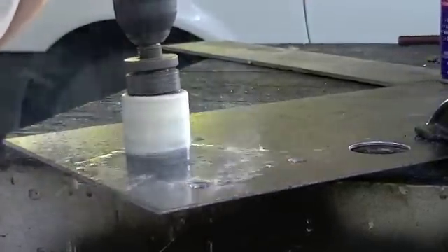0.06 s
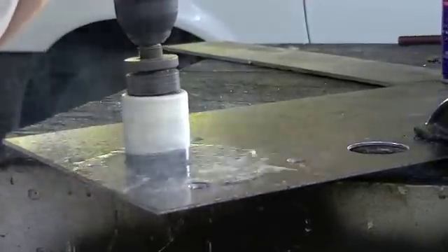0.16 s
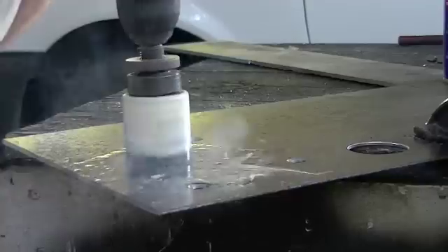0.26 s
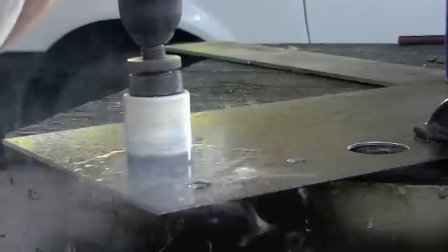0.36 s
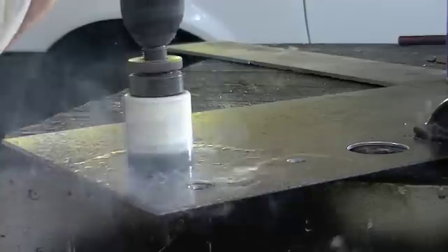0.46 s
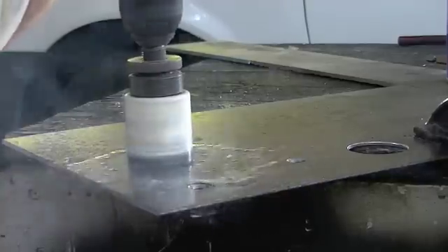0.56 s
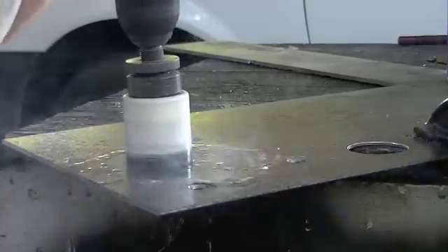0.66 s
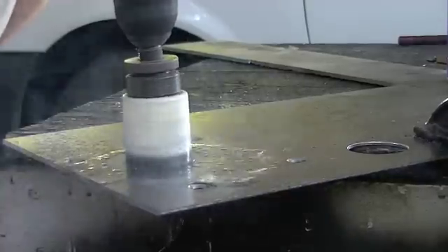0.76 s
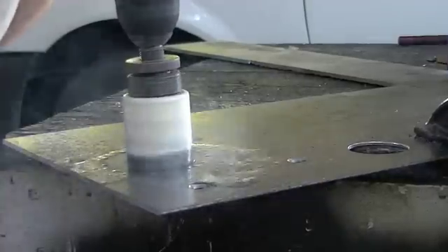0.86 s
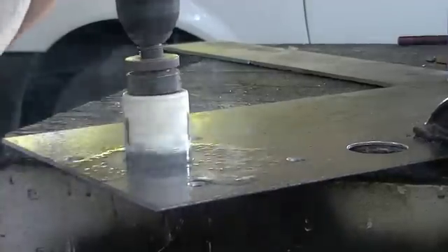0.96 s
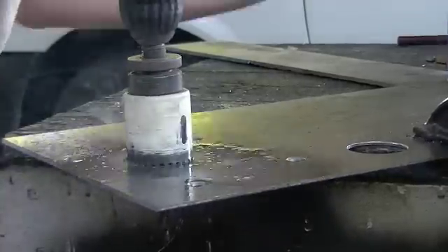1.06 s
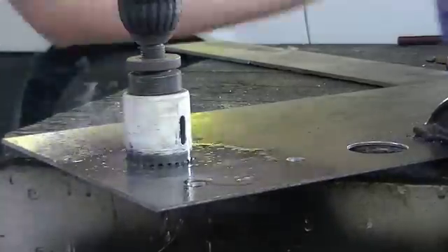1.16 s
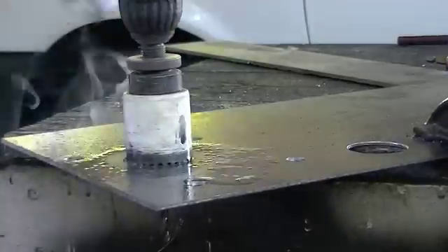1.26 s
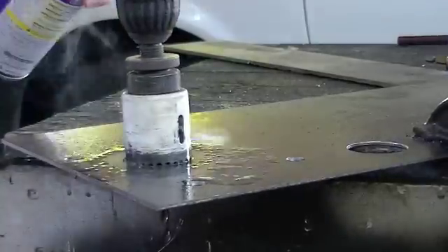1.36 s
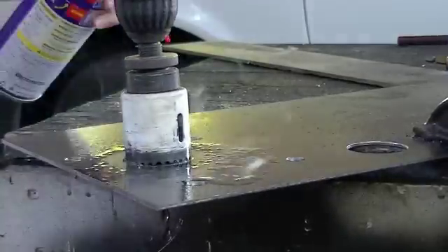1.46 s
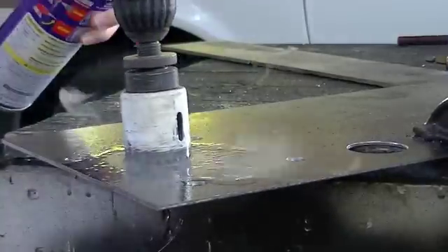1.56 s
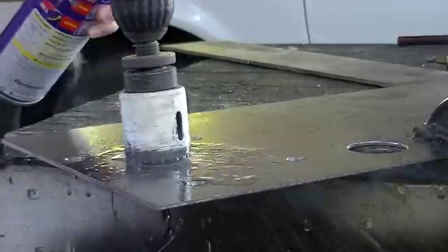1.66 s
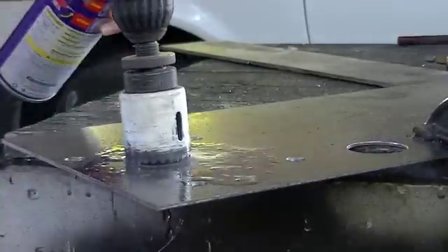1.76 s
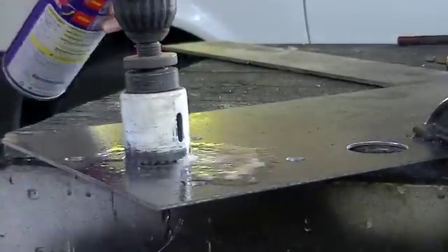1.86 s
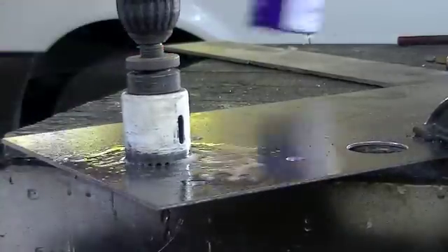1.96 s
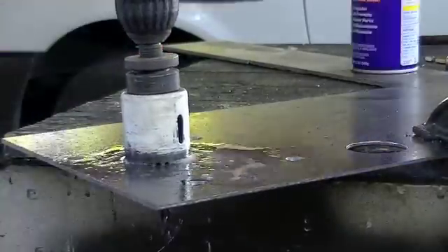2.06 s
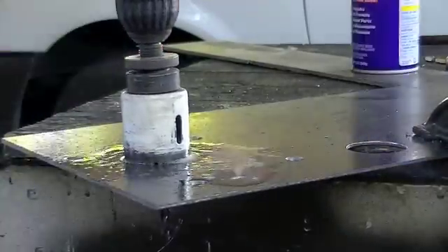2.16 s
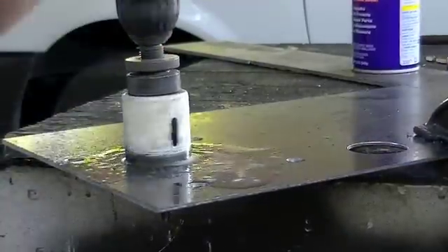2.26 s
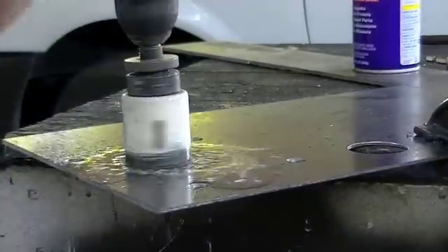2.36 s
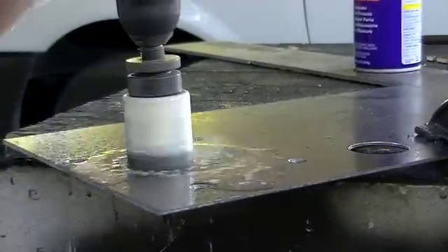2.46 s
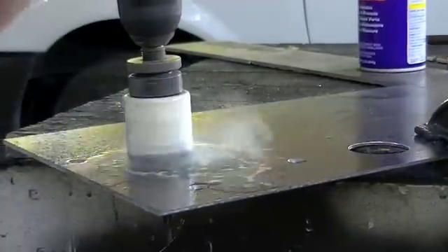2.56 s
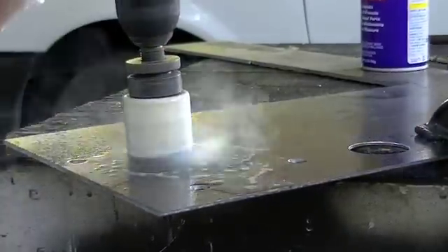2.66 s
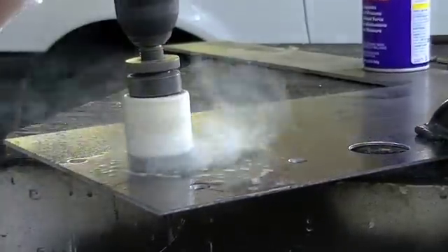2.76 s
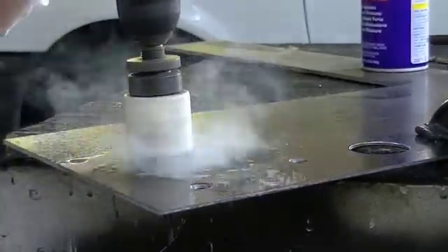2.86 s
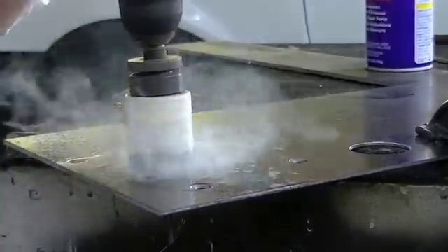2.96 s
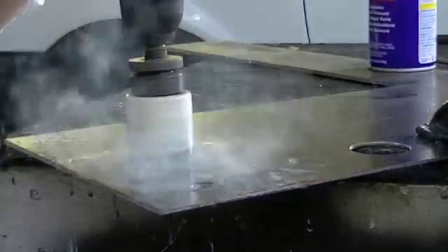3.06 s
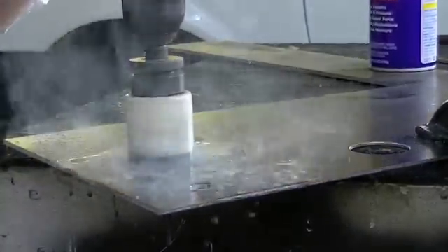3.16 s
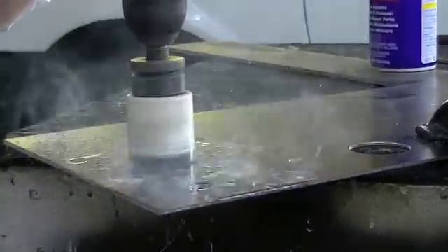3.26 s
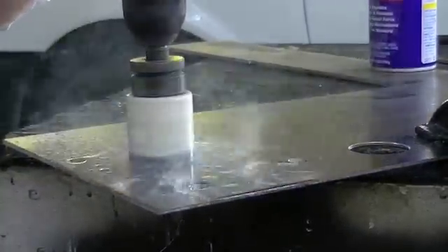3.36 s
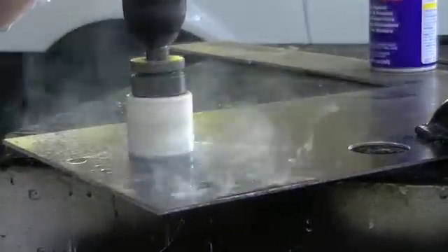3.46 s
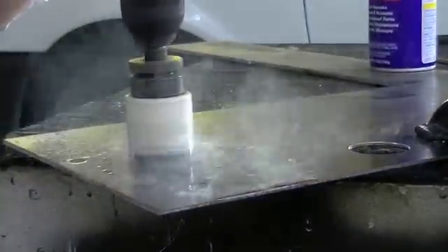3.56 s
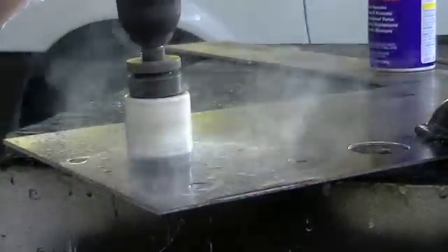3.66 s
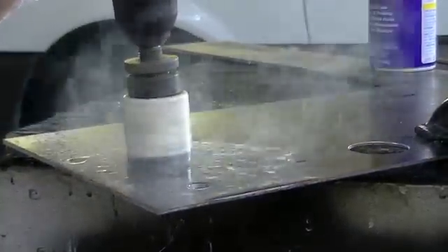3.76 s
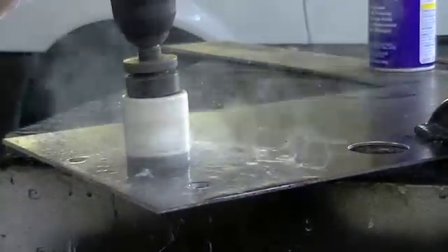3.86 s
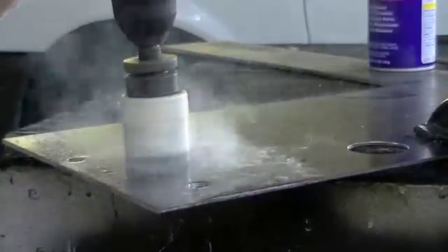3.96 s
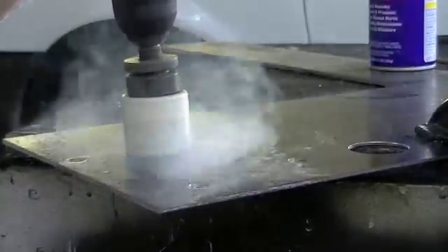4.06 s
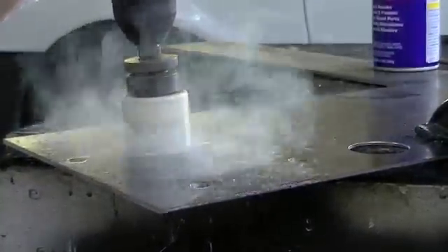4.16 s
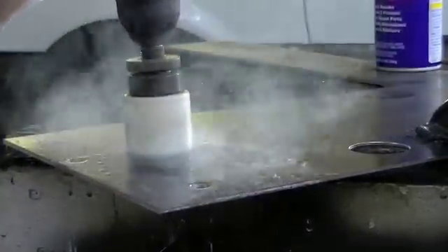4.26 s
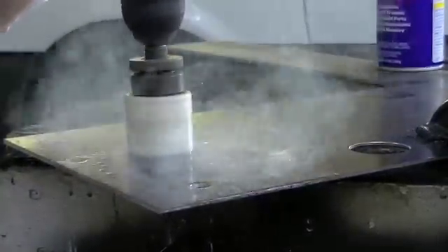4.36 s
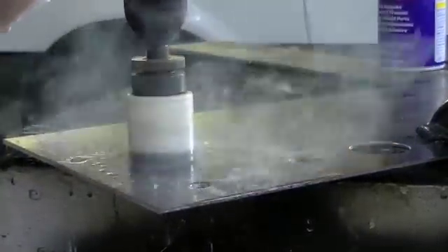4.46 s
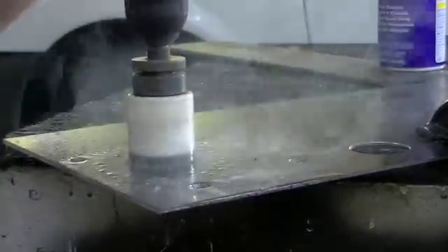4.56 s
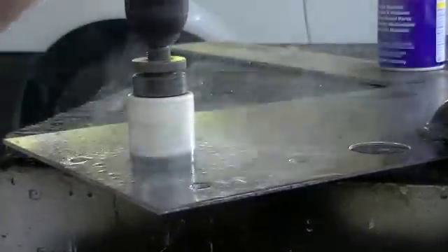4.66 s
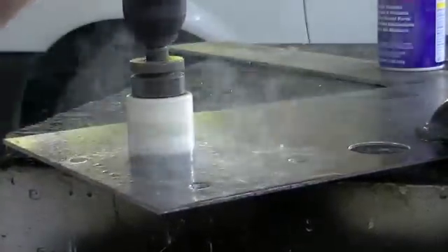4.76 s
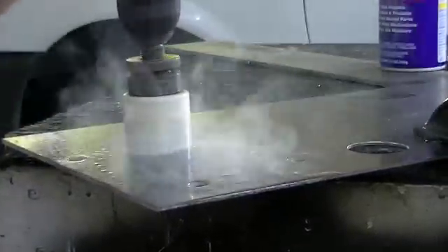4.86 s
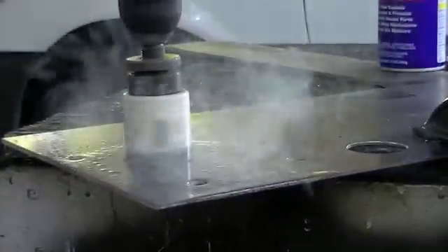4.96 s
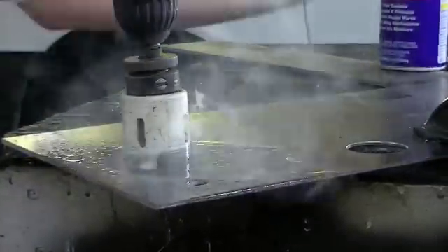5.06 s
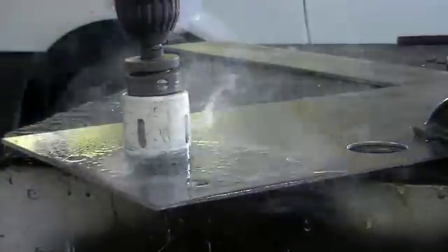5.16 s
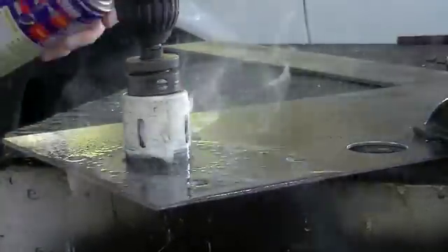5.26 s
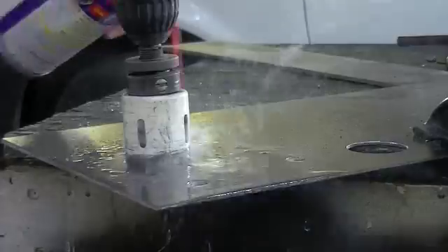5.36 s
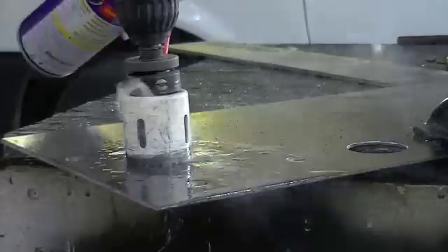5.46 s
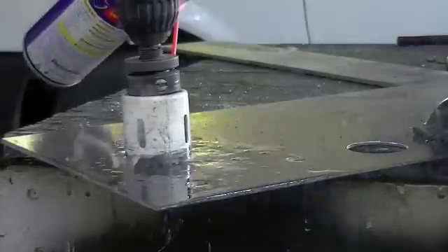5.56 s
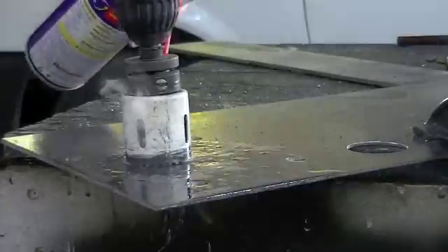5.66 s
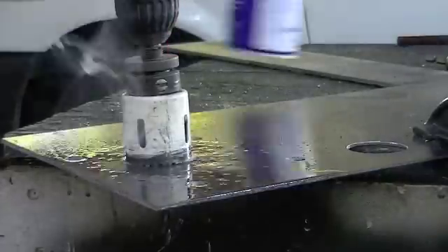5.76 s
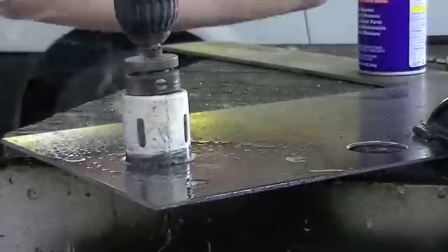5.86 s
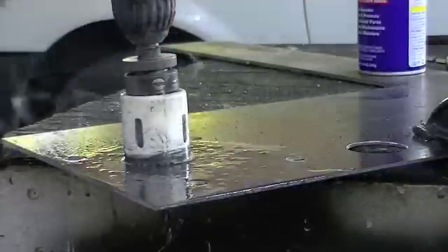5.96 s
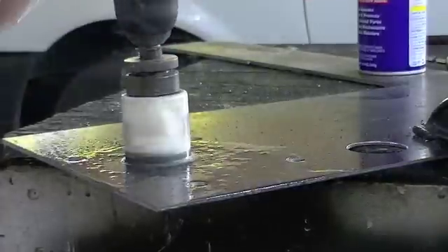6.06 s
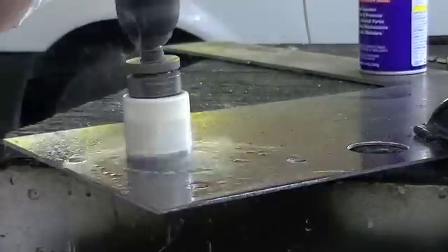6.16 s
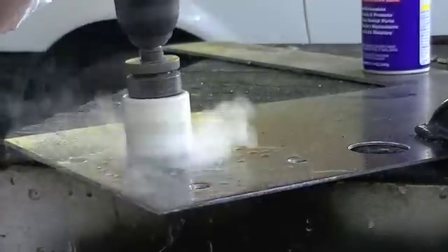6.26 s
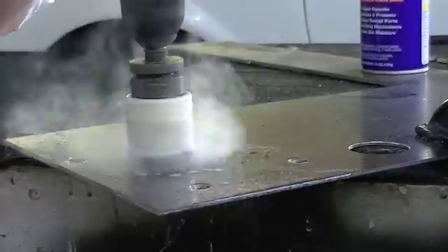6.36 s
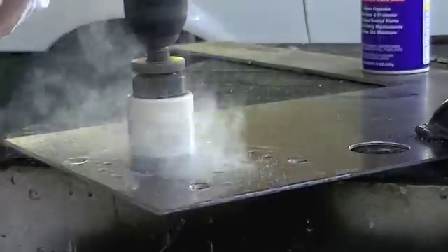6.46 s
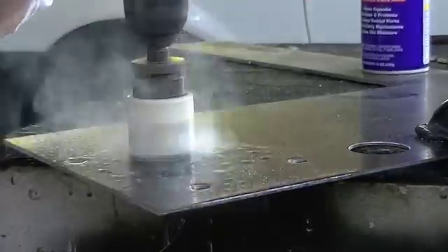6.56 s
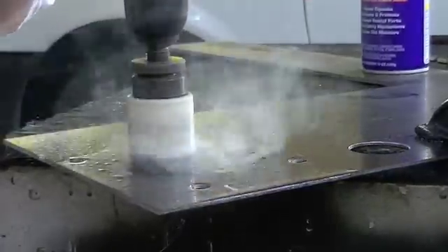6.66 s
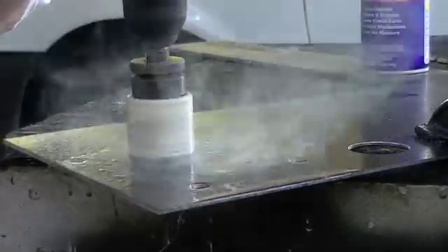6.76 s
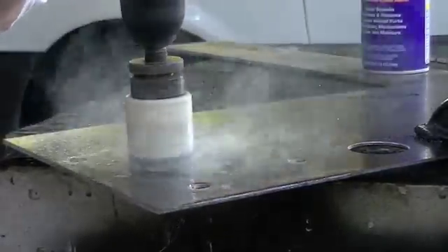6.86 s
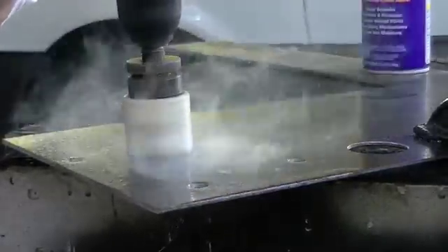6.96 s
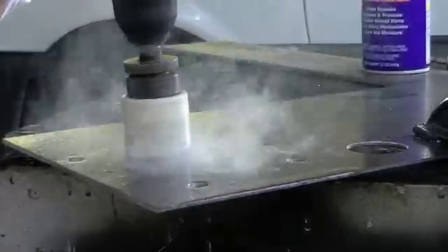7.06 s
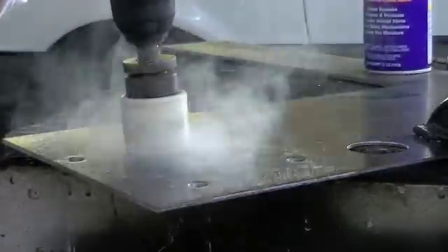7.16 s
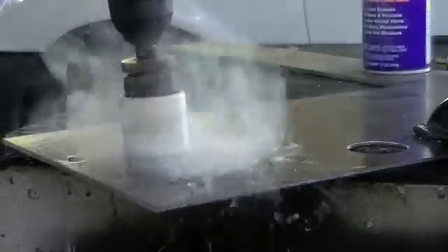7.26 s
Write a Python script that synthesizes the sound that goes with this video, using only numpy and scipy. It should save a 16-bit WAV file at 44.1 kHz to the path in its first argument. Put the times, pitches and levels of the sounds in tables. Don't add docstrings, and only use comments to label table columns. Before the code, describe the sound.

Harsh metallic cutting roars and squeals in a workshop, broken by two quiet pauses with fan hum, can knocks and hissing spray.

```python
import sys
import numpy as np
from scipy import signal
from scipy.fft import rfft, irfft, next_fast_len
from scipy.io import wavfile
from scipy.ndimage import uniform_filter1d, map_coordinates

SR = 44100
rng = np.random.default_rng(int(sys.argv[2]) if len(sys.argv) > 2 else 0)


def to_wav(sig):
    pcm = np.clip(np.atleast_2d(sig), -1, 1) * 32767
    pcm = np.round(pcm).astype(np.int16)
    wavfile.write(sys.argv[1], SR, pcm.T)


def to_linear_factor(level_db):
    exponent = np.asarray(level_db, float) / 20
    return 10 ** exponent


N = 321930
T = np.arange(N) / SR

# time in seconds, force in dB.
CUT_FORCES = [
    [(0.0, -14), (0.41, -14.5), (0.574, -16), (0.95, -13), (1.032, -18.5), (1.084, -47), (1.12, -45)],
    [(2.31, -48), (2.35, -11.5), (2.55, -12.5), (3.18, -14), (3.8, -17.5), (4.05, -12), (4.55, -15),
     (5.08, -15.5), (5.19, -45)],
    [(6.09, -41), (6.106, -26), (6.122, -11), (6.176, -11.5), (6.47, -13.5), (7.0, -13.5), (7.3, -12.5)],
]
# middle in seconds, length in seconds, squeal in dB,
# share of timing scatter removed [0-1].
TEETH_LOCKS = [(0.949, .1, 5, .4), (2.4, .12, 3, 0.04), (2.514, .06, 12, 0), (2.89, 0.42, 11, .35),
               (3.76, 0.31, -8, .1), (4.2, 0.29, 15, .1), (4.342, 0.094, 21, 0.74),
               (4.959, 0.2462, 8, 0.23), (5.126, .08, 14, 0.62), (6.38, 0.21, 7, 0),
               (6.721, 0.46, 12, 0.08), (7.079, .15, -9, 0), (7.261, .15, 5, 0)]


def saw():
    # time in seconds, speed in Hz, throb in dB.
    spindle = [(0, 51.8, 3.5), (.6, 52.3, 3), (1.1, 52.5, -1), (2.3, 66, 0), (2.75, 65, 2.2), (3.1, 53, 3),
               (3.55, 53.94, 2.5), (3.82, 50.5, 5), (4.1, 50.4, 1), (4.36, 51.97, .8), (4.58, 52, 3.5),
               (4.85, 53.02, 2.7), (6.1, 59.5, 0), (6.5, 55, 3), (6.8, 51.5, 2), (7.3, 55, 3)]
    # frequency in Hz, width in Hz, level in dB.
    plate_modes = [(1240, 85, -24), (1700, 29, -6), (2070, 64, -7), (2390, 92, -13), (3420, 140, -2),
                   (3910, 130, -3), (4840, 100, 0), (5070, 60, -1), (5770, 110, -3), (6560, 130, -2),
                   (7010, 46, -2), (7410, 76, 0), (7620, 67, -3), (8140, 92, -2), (8790, 130, -1),
                   (9140, 120, -2), (9980, 230, -4), (10500, 120, -5), (11100, 260, -2), (11800, 47, -4),
                   (12400, 110, -5), (12700, 34, -6), (13100, 220, -5), (13800, 130, -4)]
    # frequency in Hz, level in dB per Hz.
    radiation = [(200, -60), (500, -36), (650, -27), (800, -31), (1400, -23), (1900, -17), (2600, -16),
                 (3200, -9), (4400, -9), (11000, -8), (15650, -11), (15900, -70)]
    # frequency in Hz, gain in dB.
    coupling = [(500, 8), (1300, 8.5), (1700, 6.5), (2200, 3), (2800, 6.5), (3600, 3), (5000, 4), (8000, 2),
                (12000, -1), (15600, 1.5)]
    # frequency in Hz, level in dB per Hz.
    motor_spectrum = [(210, -33), (350, -18.5), (1200, -7.5), (1320, -13), (1650, -7.5), (2000, -11),
                      (2600, -34), (4400, -120)]

    gate, force_db = joined(CUT_FORCES)
    rate_hz, scatter = chatter()
    bright_db = -2.5 + np.log2(rate_hz / 2000) - 0.42 * np.clip(force_db + 12, -4, 6)
    squeal_db = -19 + sum(db * bump(s, length_s) for s, length_s, db, _ in TEETH_LOCKS)

    spin_hz, throb_db = curves(spindle)
    turn_rad = 2 * np.pi * np.cumsum(spin_hz * (1 + 0.01563 * wobble(2.14))) / SR
    bite_db = throb_db * (np.sin(turn_rad) + 0.5 * np.sin(2 * turn_rad - 1.3))
    feed_db = 0.43 * wobble(25) + 0.55 * wobble(7.4) + 0.48 * wobble(230)
    bite = to_linear_factor(bite_db + feed_db)

    teeth = slips(rate_hz, scatter, size_db=.3, loading=.6)
    chips = coloured(rush(np.ones_like, patchy_db=0.0), lambda hz: 1 / np.sqrt(1 + (5500 / (hz + 1)) ** 6))
    drive = patched(bite * teeth + to_linear_factor(1.5) * np.sqrt(bite) * chips, patchy_db=1.9)
    modes = peaky(radiation, plate_modes, lift_db=-0.5)
    ring = unit(coloured(drive, lambda hz: modes(hz) * to_linear_factor(along(coupling, hz))))

    sizzle = coloured(ring, lambda hz: 1 / np.sqrt(1 + (7000 / (hz + 1)) ** 4))
    squeal = coloured(ring, lambda hz: 1 / np.sqrt(1 + (hz / 2600) ** 8))
    pulse = to_linear_factor(.3 * (squeal_db + 16) + 1.2 * throb_db * np.sin(turn_rad))
    motor = to_linear_factor(-39) * rush(lambda hz: to_linear_factor(along(motor_spectrum, hz)), patchy_db=2.5)
    cutting = ring + (to_linear_factor(bright_db + 2.0) - 1) * sizzle + (pulse - 1) * squeal + motor
    return gate * to_linear_factor(force_db - 2.0) * cutting


def chatter():
    # time in seconds, rate in Hz.
    lean_rates = [(0, 1853), (.5, 1850), (.9, 2049), (2.33, 1955), (2.38, 1549), (2.42, 1618), (2.5, 1803),
                  (4.3, 1685), (4.93, 1651), (4.99, 1153), (5.055, 948), (5.09, 651), (5.18, 642),
                  (6.09, 1493), (6.18, 1879), (6.4, 2047), (7.2, 1699)]
    # start, top, leave and end in seconds, top rate in Hz.
    eases = [(-.1, 0, .2, .42, 3200), (.41, .52, .64, .8, 3200), (.6, .7, .84, .93, 2500),
             (2.42, 2.462, 2.472, 2.49, 2660), (2.44, 2.68, 2.72, 2.9, 2260), (2.9, 3.24, 3.3, 3.6, 2600),
             (3.18, 3.37, 3.54, 3.72, 3450), (3.55, 3.68, 3.98, 4.22, 2100), (4.37, 4.49, 4.66, 4.9, 3150),
             (4.55, 4.75, 4.79, 4.93, 3600), (6.4, 6.5, 6.62, 6.9, 3550), (6.45, 6.6, 6.9, 7.0, 3750),
             (6.8, 6.95, 7.07, 7.23, 2250)]
    oiled_s = [-1.5, 2.33, 6.1]
    wet_scatter, dry_scatter, dries_s, scatter_per_octave = 0.0913, 0.208, 1.03, 0.025

    lean_hz, = curves(lean_rates)
    candidates_hz = [lean_hz]
    for *times_s, top_hz in eases:
        candidates_hz.append(lean_hz + (top_hz - lean_hz) * np.interp(T, times_s, [0, 1, 1, 0]))
    rate_hz = uniform_filter1d(np.max(candidates_hz, axis=0), size=600)

    oil_age_s = T - np.take(oiled_s, np.searchsorted(oiled_s, T) - 1)
    dryness = 1 - np.exp(-oil_age_s / dries_s)
    scatter = wet_scatter + (dry_scatter - wet_scatter) * dryness + scatter_per_octave * np.log2(rate_hz / 2000)
    locked = sum(share * bump(s, length_s) for s, length_s, _, share in TEETH_LOCKS)
    return rate_hz, np.clip(scatter * (1 - locked), .04, .45)


def slips(rate_hz, scatter, size_db, loading):
    count = np.cumsum(rate_hz) / SR
    luck = rng.standard_normal((2 * N // 20, 2))
    waits = np.exp(np.interp(np.arange(len(luck)), count, scatter) * luck[:, 0])
    waits = waits / uniform_filter1d(waits, size=400)
    at = np.interp(np.cumsum(waits), count, np.arange(N), right=2 * N)
    size = (1 + np.clip(loading, 0, 1) * (waits - 1)) * to_linear_factor(size_db * luck[:, 1])
    tap = np.floor(at)[:, None] + np.arange(16) - 7
    offset = tap - at[:, None]
    kernel = np.sinc(offset) * np.cos(np.pi * offset / 16) ** 2
    index = np.clip(tap, 0, N).astype(int).ravel()
    train = np.bincount(index, (size[:, None] * kernel).ravel(), N + 1)[:N]
    return (train - rate_hz / SR) / np.sqrt(rate_hz / SR)


def knocks():
    # start in seconds, peak, body and sizzle in dB, t60 in seconds.
    hard_knocks = [(1.2065, -11.5, -17, -6.5, 0.093), (1.2494, -26, -30, -5, 0.11),
                   (1.3232, -8.5, -12, 0.5, 0.077), (2.056, -17.5, -25, 2, 0.064),
                   (2.1019, -2.5, -25, -8.5, 0.14), (2.161, -11, -27, -21, 0.063),
                   (2.2185, -22.5, -32, -12, 0.077), (2.2776, -17.5, -23, -6, 0.1),
                   (3.881, -2, -39, -11, 0.052), (4.309, -5, -28, -32, 0.1), (5.154, -17, -14, -38, 0.07),
                   (5.8986, 0.5, -20, -6, 0.082), (6.0416, -11.5, -18.5, -18, 0.075)]
    # start in seconds, peak, body and sizzle in dB.
    scuffs = [(1.1566, -23, -9, -14), (1.436, -12.5, -23, -6), (1.4607, 2.5, -28.5, -2),
              (2.0346, -12.5, -21, -4), (2.342, 7.5, -25.5, -22), (2.4584, 7, -30.5, -23),
              (6.087, -10, -10, -2), (6.1197, 7.5, -24, -30)]
    # frequency in Hz, level in dB, t60 in seconds.
    can_first = [(647, -17, 0.26), (1182, -13.5, 0.11), (1685, -9, 0.07), (4120, -11, 0.075),
                 (6130, -8, 0.059), (7600, -13, 0.16), (9500, -15, 0.12)]
    # frequency in Hz, level in dB, t60 in seconds.
    can_second = [(653, -18, 0.38), (1470, -5, 0.1), (3140, -10, 0.08), (3830, -11, 0.11), (5000, -15, 0.2),
                  (5840, -14, 0.2), (7760, -14, 0.31), (8400, 8.5, 0.061)]

    out, t = np.zeros(N + SR), np.arange(SR // 3) / SR
    contacts = [(*row, 0.8) for row in hard_knocks]
    contacts += [(*row, 0.083, 4.1) for row in scuffs]
    for s, db, body_db, sizzle_db, t60_s, rise_ms in contacts:
        colour = [(300, -37), (700, body_db + 6), (1800, body_db + 22.0), (3500, 1.5), (6500, 2),
                  (10000, sizzle_db + 8.5), (16300, sizzle_db + 0.5), (17000, -81)]
        crack = unit(coloured(rng.standard_normal(len(t)), lambda hz: to_linear_factor(along(colour, hz))))
        decay = to_linear_factor(-60 * t / t60_s) + 2.4 * to_linear_factor(-60 * t / 0.011)
        rise = (1 - np.exp(-1000 * t / max(rise_ms, .05))) ** 2
        out[round(s * SR):][:len(t)] += to_linear_factor(db - 13.5) * decay * rise * crack

    for s, db, modes in [(2.102, -10, can_first), (5.899, -20, can_second)]:
        ring = sum(to_linear_factor(db + level_db - 60 * t / t60_s) * np.sin(2 * np.pi * hz * t) for hz, level_db, t60_s in modes)
        out[round(s * SR):][:len(t)] += ring * (1 - np.exp(-t / 0.0017))
    return out[:N]


def spray():
    # start in seconds, end in seconds, hiss in dB.
    valve_holds = [(1.575, 1.953, -38), (1.955, 2.03, -47), (5.302, 5.345, -39), (5.348, 5.526, -39.5),
                   (5.53, 5.56, -50), (5.695, 5.742, -41)]
    # middle in seconds, whistle in dB, length in seconds.
    sputters = [(1.615, -35.5, .05), (1.678, -33, .018), (1.705, -34, 0.059), (1.798, -32.5, .02),
                (1.937, -35, .01), (5.325, -40, 0.029), (5.422, -36, 0.025), (5.492, -32, 0.023)]
    # frequency in Hz, level in dB per Hz.
    jet_spectrum = [(1760, -45), (3000, -11), (4350, -11), (4760, -8), (6960, -9.5), (9360, -7),
                    (15600, -9.5), (15900, -70)]
    opens_s, shuts_s, whistle_db = .025, .012, -22

    flow = sum(to_linear_factor(db) * ramp(start_s, opens_s) * (1 - ramp(end_s, shuts_s)) for start_s, end_s, db in valve_holds)
    spits = sum(to_linear_factor(db) * bump(s, length_s) for s, db, length_s in sputters)
    jet = rush(lambda hz: to_linear_factor(along(jet_spectrum, hz)), patchy_db=1)
    nozzle = rush(lambda hz: 1 / (1 + ((hz - 6600) / 900) ** 2), patchy_db=1.5)
    whistle = (to_linear_factor(whistle_db) * flow + spits) * to_linear_factor(-6.5 + 2.0 * wobble(45)) * nozzle
    return to_linear_factor(-4.0) * flow * jet + whistle


def shop():
    # frequency in Hz, level in dB per Hz.
    air_spectrum = [(15, -66), (25, -49), (116, -41), (165, -13), (282, -5.5), (332, -9.5), (423, -8),
                    (471, -6), (600, -4), (851, -6.5), (1620, -10.5), (4770, -16.5), (10700, -24.5),
                    (11900, -23), (15600, -38)]
    # frequency in Hz, width in Hz, level in dB.
    fan_peaks = [(310, 29, -13), (342, 17, -7.5), (386.5, 8.6, -8.5), (469.3, 17, -6.5), (515, 30, -10.5),
                 (643, 9.2, -3.5)]
    # time in seconds, frequency in Hz, level in dB.
    far_motor = [(1.15, 450, -54), (1.36, 490, -57), (1.47, 515, -40), (1.6, 538, -60), (1.85, 586, -44.5),
                 (1.93, 591, -56), (1.98, 496, -48)]

    gain_db = shop_gain_db()
    air = rush(peaky(air_spectrum, fan_peaks, lift_db=7.5), patchy_db=1.5)
    air = to_linear_factor(gain_db + 7.5 + 0.094 * wobble(9.8)) * air
    drone = to_linear_factor(gain_db + 1 + 2.5 * wobble(9)) * tone(472 + 2.5 * wobble(5))
    fan = to_linear_factor(gain_db - 5.5 + 2.2 * wobble(6.2)) * tone(388 + 2.28 * wobble(5))
    gate, whine_hz, whine_db = joined([far_motor])
    whine = gate * to_linear_factor(whine_db + 2.5 + 1.8 * wobble(20.06)) * tone(whine_hz)
    thumps = to_linear_factor(-74.5 + 6.5 * wobble(40)) * rush(lambda hz: 1 / (1 + (hz / 200) ** 3), patchy_db=5.0)
    return air + drone + fan + whine + thumps


def shop_gain_db():
    open_db, ducked_db, opens_s, ducks_s = -49, -72.5, 0.084, 0.026
    opened = 0
    for cut, following in zip(CUT_FORCES, CUT_FORCES[1:]):
        opened = opened + ramp(cut[-2][0], opens_s) - ramp(following[1][0], ducks_s)
    return ducked_db + (open_db - ducked_db) * opened + 3.5 * bump(5.72, .3)


def walls(x):
    # frequency in Hz, t60 in seconds.
    room_t60 = [(300, 1), (3000, 0.21), (12000, 0.089)]
    hz, t, z = signal.stft(rng.standard_normal(SR // 2), SR, nperseg=256)
    decay = to_linear_factor(-60 * t / along(room_t60, hz)[:, None])
    tail = signal.istft(z * decay, SR, nperseg=256)[1]
    return signal.fftconvolve(np.pad(x, (200, 0)), tail / np.linalg.norm(tail))[:N]


def unit(x):
    return x / np.sqrt(np.mean(x ** 2) + 1e-20)


def along(points, hz):
    f, v = np.transpose(points)
    return np.interp(np.log(hz + 1), np.log(f + 1), v)


def curves(rows):
    s, *cols = np.transpose(rows)
    return [np.interp(T, s, c) for c in cols]


def joined(spans):
    gate, rows = 0, []
    for span in spans:
        start_s, end_s = span[0][0], span[-1][0]
        since_s = T - start_s + (start_s < .01)
        left_s = end_s - T + (end_s > 7.2)
        gate = gate + np.clip(np.minimum(since_s, left_s) / .015, 0, 1)
        rows += list(span)
    return [gate] + curves(rows)


def tone(hz):
    return np.sin(2 * np.pi * np.cumsum(hz) / SR)


def wobble(rate_hz):
    return map_coordinates(rng.standard_normal(int(N * rate_hz / SR) + 4), [T * rate_hz])


def ramp(start_s, length_s):
    return np.sin(np.pi / 2 * np.clip((T - start_s) / max(length_s, .001), 0, 1)) ** 2


def bump(middle_s, length_s):
    return np.exp(-(2 * (T - middle_s) / length_s) ** 2)


def peaky(spectrum, peaks, lift_db):
    def gain(hz):
        power = to_linear_factor(2 * along(spectrum, hz))
        for centre_hz, width_hz, db in peaks:
            power = power + to_linear_factor(2 * (db + lift_db)) / (1 + (2 * (hz - centre_hz) / width_hz) ** 2) ** 2
        return np.sqrt(power)
    return gain


def coloured(x, gain):
    m = 2 * next_fast_len(len(x) // 2 + 4096)
    cep = irfft(np.log(gain(np.fft.rfftfreq(m, 1 / SR)) + 1e-6), m)
    cep[1:m // 2] *= 2
    cep[m // 2 + 1:] = 0
    return irfft(rfft(x, m) * np.exp(rfft(cep)), m)[:len(x)]


def patched(x, patchy_db):
    z = signal.stft(x, nperseg=512)[2]
    field = uniform_filter1d(rng.standard_normal(z.shape), size=5, axis=0)
    field = uniform_filter1d(field, size=16, axis=1)
    return signal.istft(z * to_linear_factor(patchy_db * unit(field)), nperseg=512)[1][:N]


def rush(gain, patchy_db):
    return unit(coloured(patched(rng.standard_normal(N), patchy_db), gain))


def scene():
    near = saw() + knocks()
    mid = near + to_linear_factor(-12.0) * walls(near) + spray() + shop()
    side_noise = rush(lambda hz: 1 / (1 + (hz / 500) ** 2), patchy_db=3.5)
    side = to_linear_factor(-40 + 6 * wobble(12)) * walls(mid) + to_linear_factor(-82) * side_noise
    return np.array([mid + side, mid - side])


def roll_off(x):
    return signal.sosfilt(signal.butter(12, 17080, fs=SR, output="sos"), x)


def record(dry):
    limited = dry / (1 + np.abs(dry / .95) ** 6) ** (1 / 6)
    return roll_off(limited)


dry = scene()
out = record(dry)
to_wav(out)
```